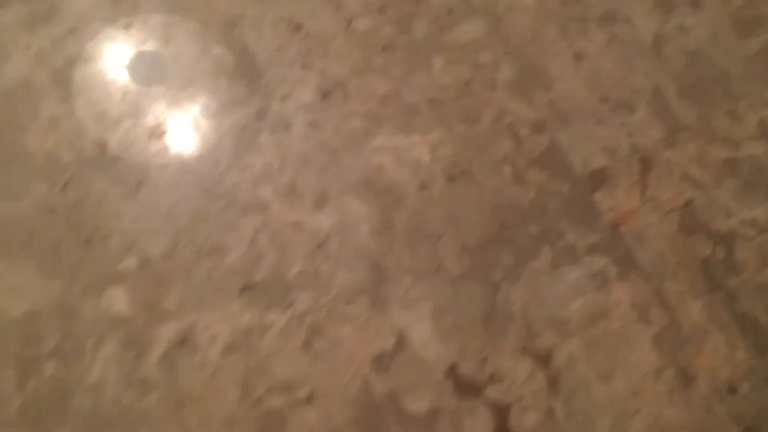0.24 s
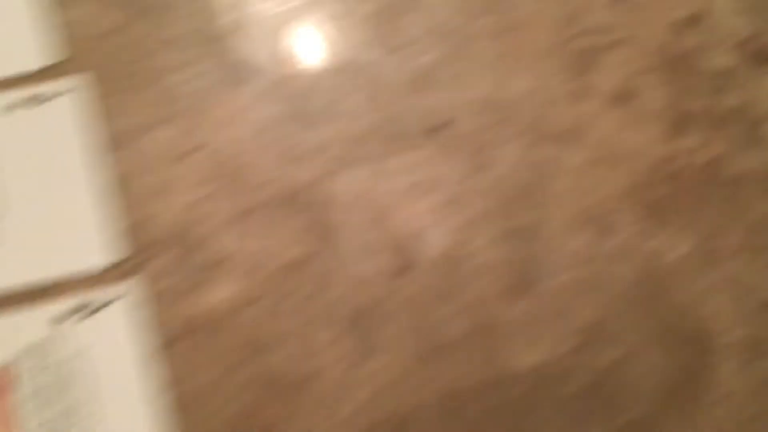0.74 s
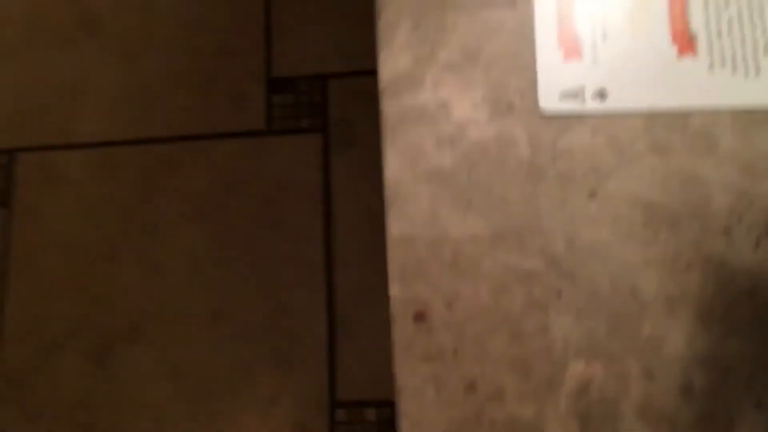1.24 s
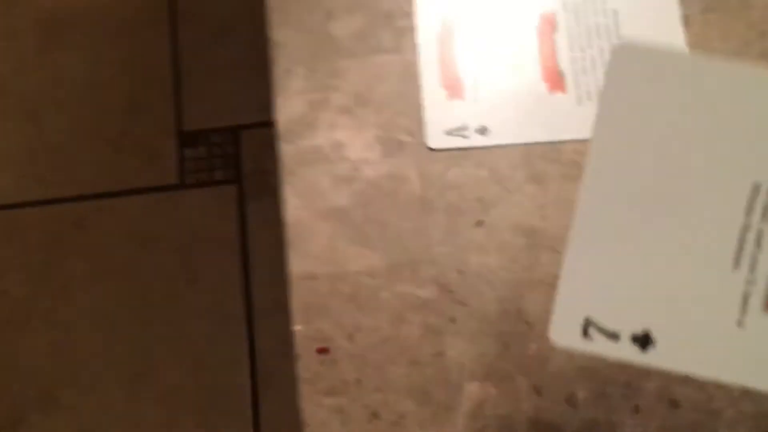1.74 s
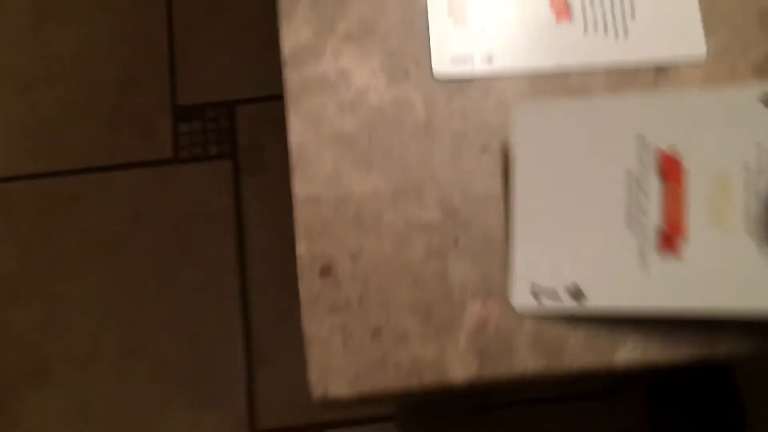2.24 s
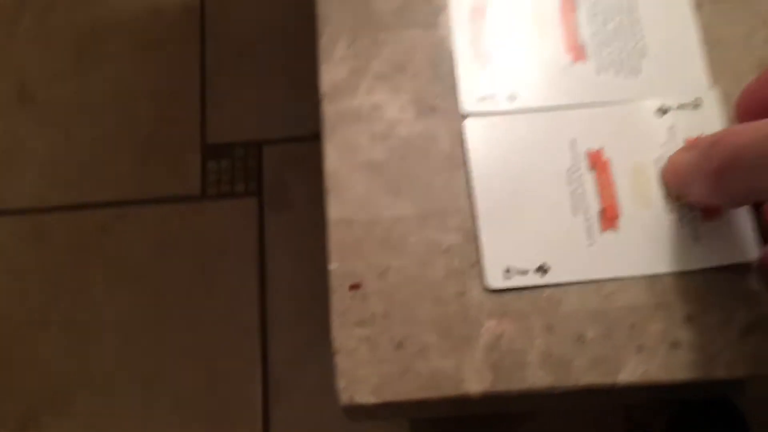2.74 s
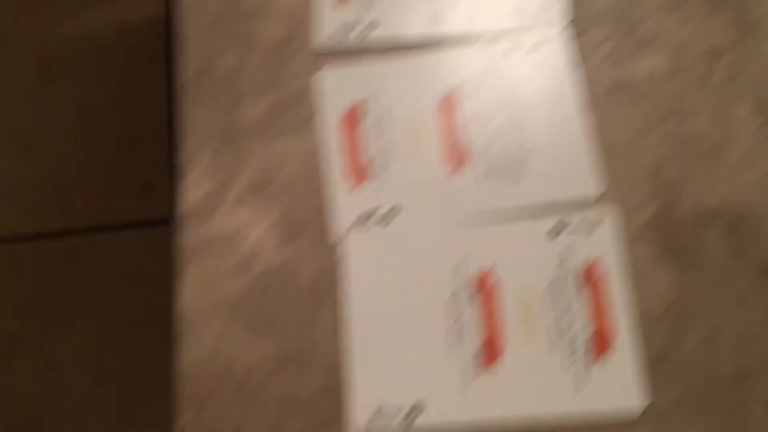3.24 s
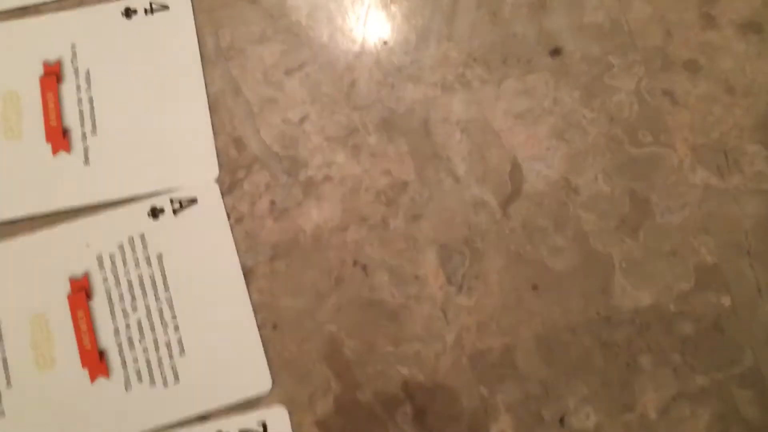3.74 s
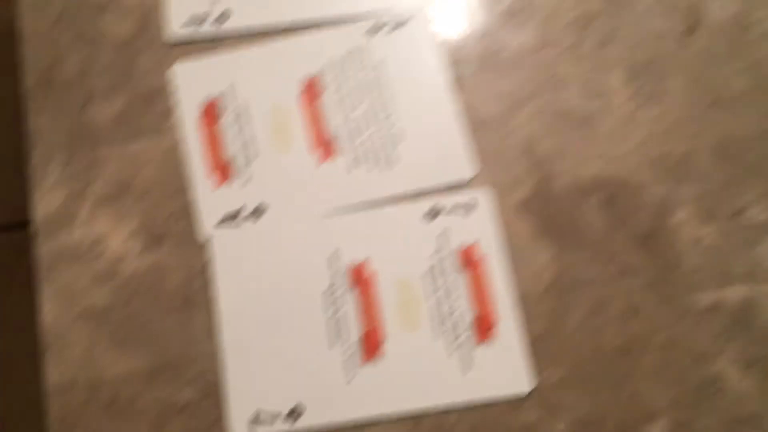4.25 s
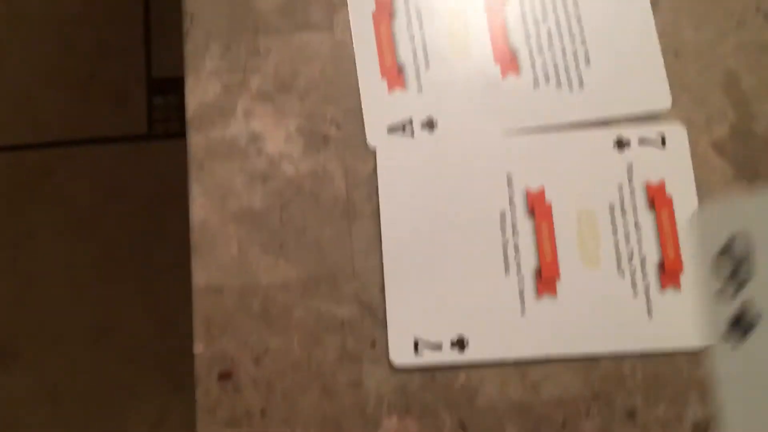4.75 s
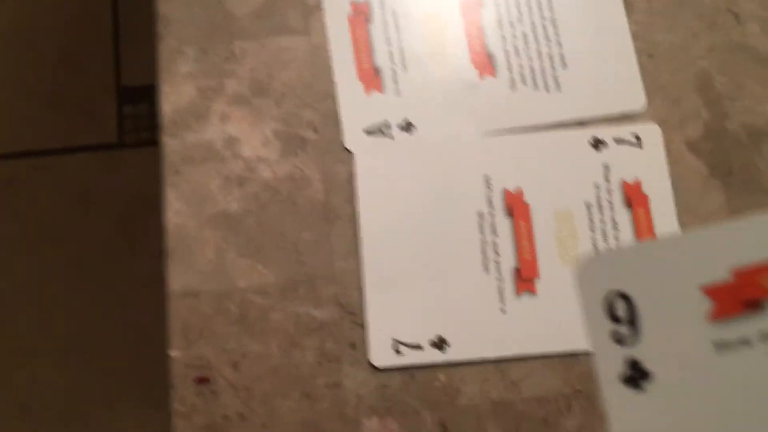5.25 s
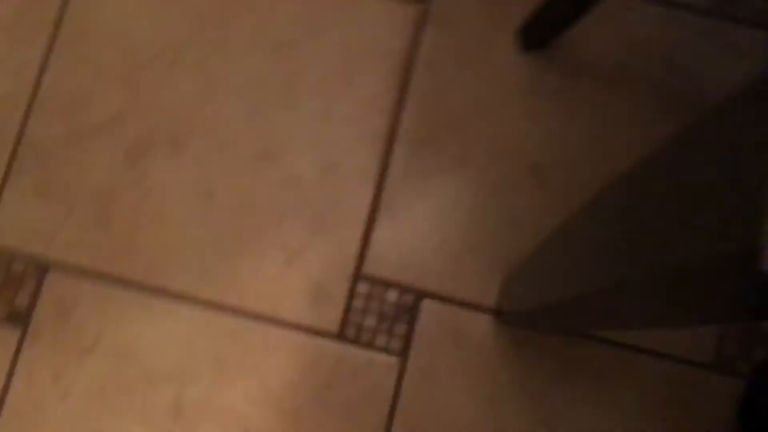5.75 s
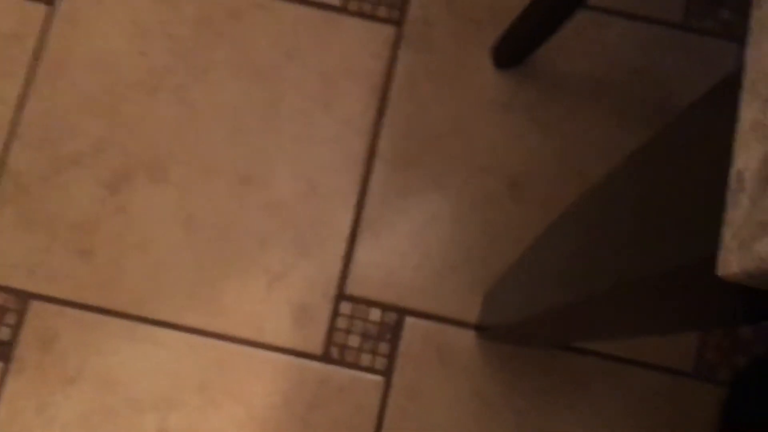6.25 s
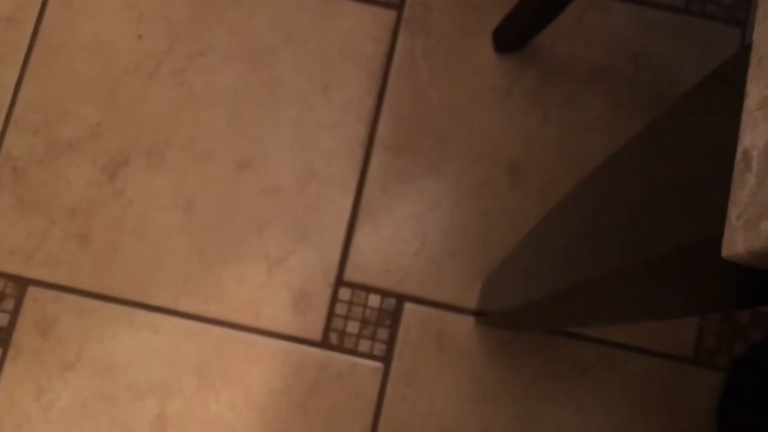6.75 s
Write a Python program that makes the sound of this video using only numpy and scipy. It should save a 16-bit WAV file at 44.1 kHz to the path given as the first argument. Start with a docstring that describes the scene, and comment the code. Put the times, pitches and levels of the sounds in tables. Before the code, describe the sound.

Playing cards swish papery over one another and snap down onto a hard kitchen counter, with small ticks, flicks and soft hand thuds.

```python
"""Cards dealt onto a kitchen counter

Playing cards are dealt onto a kitchen countertop, close to a hand-held microphone.
Each rub of card on card is three bands of shaped noise; ticks, flicks and a slap are bursts of tiny
contacts sounding through the card's resonances. The counter thuds under the hand as decaying sines.
A small hard room answers with decaying noise echoes, over quiet air and a low hum."""
import sys
import numpy as np
from scipy import signal
from scipy.fft import rfft, irfft, next_fast_len
from scipy.io import wavfile
from scipy.ndimage import uniform_filter1d, map_coordinates

SR = 44100
rng = np.random.default_rng(int(sys.argv[2]) if len(sys.argv) > 2 else 0)


def generate_wav(signal):
    """Clip the signal to [-1, 1] and save it as 16-bit WAV at the path in sys.argv[1]."""
    frames = np.transpose(np.atleast_2d(signal))
    scaled = np.clip(frames, -1, 1) * 32767
    pcm = np.round(scaled).astype(np.int16)
    wavfile.write(sys.argv[1], SR, pcm)


N = 308700  # length [samples], 7 s


def amp(db):
    """Decibels to gain."""
    return 10 ** (np.asarray(db) / 20)


def unit(x):
    """Scale to rms 1."""
    return x / np.sqrt(np.mean(x ** 2) + 1e-30)


def along(points, hz):
    """Read (frequency [Hz], value) points on a log frequency axis."""
    f, v = np.transpose(points)
    return np.interp(np.log(hz + 1), np.log(f + 1), v)


def wobble(rate):
    """A smooth random curve through `rate` knots a second."""
    knots = rng.standard_normal(int(N * rate / SR) + 4)
    return map_coordinates(knots, [np.arange(N) * rate / SR])


def filtered(x, response):
    """Shape x by a response given as a function of frequency."""
    size = next_fast_len(len(x) + SR // 10)
    spectrum = rfft(x, size) * response(np.fft.rfftfreq(size, 1 / SR))
    return irfft(spectrum, size)[:len(x)]


def coloured(x, spectrum):
    """Tint x with (frequency [Hz], gain [dB]) points, at rms 1."""
    return unit(filtered(x, lambda hz: amp(along(spectrum, hz))))


def causal(gain_db, size=1024):
    """Minimum-phase impulse response of a gain in dB, by folding its cepstrum."""
    cepstrum = irfft(np.log(amp(gain_db(np.fft.rfftfreq(size, 1 / SR)))))
    fold = 1 + np.sign(size // 2 - np.arange(size))
    fold[0] = 1
    return irfft(np.exp(rfft(cepstrum * fold)))


def add(track, s, sound):
    """Mix a sound into a track at time s [s]."""
    start = max(round(s * SR), 0)
    part = track[start:start + len(sound)]
    part += sound[:len(part)]


# colour of the quiet room: (frequency [Hz], relative density [dB per Hz])
QUIET_COLOUR = [(15, -36.5), (25, -15), (61, -3), (96, -13), (126, -13), (211, -18.5), (307, -18.5),
                (513, -25), (691, -27), (1320, -30.5), (1870, -30.5), (2890, -34.5), (3680, -34.5),
                (9210, -40.5), (15800, -46)]
QUIET_DB = -64.5  # rms level


def background(hum_hz=59, hum_db=-74):
    """Still room air and microphone hiss as tinted noise, with a low hum wavering in level and phase."""
    hum_level = amp(hum_db + 4 * wobble(7.8))
    hum = hum_level * np.sin(2 * np.pi * hum_hz * np.arange(N) / SR + 0.56 * wobble(4.1))
    return amp(QUIET_DB) * coloured(rng.standard_normal(N), QUIET_COLOUR) + hum


# how long the kitchen's echo lasts: (frequency [Hz], 60 dB decay time [s])
ECHO_DECAY = [(150, 0.5), (800, 0.7), (2000, 0.96), (5000, 1.01), (9000, 0.75), (15000, 0.33)]
# tone of the kitchen's echo: (frequency [Hz], relative level [dB])
ECHO_TONE = [(100, 3.5), (600, 4), (900, 4), (2000, 1), (2700, 1), (3600, -1), (6000, 1.5), (8000, -2),
             (15000, 1.5)]


def room(x, onset=0.003, early_db=5, early=0.075, count=7):
    """Strong early answers from near surfaces, then a diffuse echo; its noise tail is redrawn for each
    of `count` stretches as the microphone moves."""
    out = np.zeros(N)
    for index in np.array_split(np.arange(N), count):
        hz, t, noise = signal.stft(rng.standard_normal(SR * 2 // 3), SR, nperseg=256)
        decay_db = -60 * t / along(ECHO_DECAY, hz)[:, None]
        near_walls_db = early_db * np.exp(-t / early)
        fade_db = along(ECHO_TONE, hz)[:, None] + decay_db + near_walls_db
        tail = signal.istft(noise * amp(fade_db) * (1 - np.exp(-t / onset)), SR, nperseg=256)[1]
        add(out, index[0] / SR, signal.fftconvolve(x[index], tail / np.linalg.norm(tail)))
    return out


def snap_echo(click_db=-15, flick_db=-18, slap_db=-15, count=4):
    """The room's echo of the clicks, flicks and slap, dense and smooth: a blend of several random draws."""
    snaps = lambda: amp(click_db) * clicks() + amp(flick_db) * flicks() + amp(slap_db) * slaps()
    return sum(room(snaps()) for _ in range(count)) / np.sqrt(count)


# ringing modes of the worktop: (frequency [Hz], relative level [dB], 60 dB decay time [s])
COUNTER_MODES = [(240, 0, .14), (352, -2, .16), (455, -6, .12), (828, 1, .17), (1100, -1, .14),
                 (1390, -4, .15), (1547, -4, .17), (1768, -5, .18), (1890, -5, .2), (2212, -4, .15)]


def counter(waver=1.0):
    """A slap leaves the worktop ringing in decaying sines; the resting hand makes each phase drift."""
    out, t = np.zeros(N), np.arange(SR // 3) / SR
    for s, *_, db in SLAPS:
        for hz, mode_db, t60 in COUNTER_MODES:
            drift = waver * coloured(rng.standard_normal(len(t)), [(20, 0), (60, -10), (250, -60)])
            mode = np.sin(2 * np.pi * hz * t + drift)
            add(out, s + SLAP_GAP_S, amp(db + mode_db - 60 * t / t60) * mode)
    return out


# the hand's weight reaches the counter:
# (time [s], fundamental's level before attack and decay [dB], pitch [Hz], 60 dB decay time [s])
HAND_THUDS = [(.166, -45, 96.4, 0.39), (.39, -48.5, 98, .1), (0.876, -49.5, 353, 0.038),
              (2.234, -51, 230, 0.054), (2.7683, -31.5, 382, 0.016), (2.77, -45, 171, 0.091),
              (3.523, -52, 376, 0.058), (3.532, -39.5, 104, 0.21), (4.099, -40.5, 182, 0.066),
              (4.347, -47, 166, 0.047), (4.398, -38.5, 198, 0.024), (6.482, -31, 141, 0.083),
              (6.485, -42, 343, 0.033)]


def thuds(overtone=2.07, overtone_db=-9, rumble_db=-12, attack=0.00129):
    """Soft pushes set counter and hand swinging: a sine, a faster-fading overtone and some rumble."""
    out, t = np.zeros(N), np.arange(SR // 3) / SR
    for s, db, hz, t60 in HAND_THUDS:
        upper = amp(overtone_db - 30 * t / t60) * np.sin(2 * np.pi * overtone * hz * t)
        swing = np.sin(2 * np.pi * hz * t) + upper
        rumble_colour = [(hz / 4, -20), (hz, 0), (hz * 3, -8), (hz * 8, -40)]
        rumble = coloured(rng.standard_normal(len(t)), rumble_colour)
        envelope = amp(db - 60 * t / t60) * (1 - np.exp(-t / attack))
        add(out, s, envelope * (swing + amp(rumble_db) * rumble))
    return out


# a rubbed card (high) or the shifting hand (low) scuffs:
# (time of peak [s], level at peak [dB], centre [Hz], half length to 1/e [s])
SCUFF_EVENTS = [(.19, -65, 180, .032), (.2, -49, 13100, 0.1), (0.645, -64, 378, 0.052),
                (1.471, -65.5, 212, 0.076), (2.383, -62.5, 2960, 0.063), (3.801, -57, 2020, 0.057),
                (4.108, -53.5, 1920, 0.018), (5.944, -68.5, 3400, 0.046)]


def scuffs(width=0.19):
    """Friction noise swells and fades in one broad resonance."""
    out, t = np.zeros(N), np.arange(-SR // 5, SR // 5) / SR
    for s, db, centre_hz, half in SCUFF_EVENTS:
        resonance = lambda hz: 1 / (1 + (np.log((hz + 1) / centre_hz) / width) ** 2)
        band = unit(filtered(rng.standard_normal(len(t)), resonance))
        add(out, s + t[0], amp(db) * band * np.exp(-(t / half) ** 2))
    return out


def patchy(x, patchy_db):
    """The changing bend of a card lifts now one band, now another."""
    z = signal.stft(x, nperseg=512)[2]
    field = uniform_filter1d(rng.standard_normal(z.shape), 7, axis=0)
    field = uniform_filter1d(field, 7, axis=1)
    lifted = z * amp(patchy_db * unit(field))
    return unit(signal.istft(lifted, nperseg=512)[1][:N])


def friction(spectrum, grain_rate, grain_share):
    """Countless fibre slips, with sparser catches (grain_rate a second) of the card's textured finish."""
    catches = (rng.random(N) < grain_rate / SR) * rng.standard_normal(N)
    share = np.clip(grain_share, 0, 1)  # of the power
    fibres = np.sqrt(1 - share) * rng.standard_normal(N)
    return patchy(coloured(fibres + np.sqrt(share) * unit(catches), spectrum), patchy_db=2.2)


# one push of card over card: (time of top speed [s], rise [s], fall [s], level of the paper band
# at top speed [dB], low rasp re that level [dB], high hiss re that level [dB])
PUSHES = [(.06, 0.058, 0.065, -63.5, -4.5, 14), (.155, 0.043, 0.042, -55.5, -4.5, 12.5),
          (0.234, 0.059, 0.067, -54.5, -11, 7.5), (.5, 0.072, 0.072, -59.5, -6.5, 3),
          (0.639, 0.038, 0.071, -60, -1.5, -2.5), (.965, 0.037, 0.027, -63, 1, 0),
          (1.05, 0.099, 0.096, -65.5, -4, -0.5), (2.38, 0.078, 0.059, -65.5, -3.5, -3),
          (2.5, 0.077, 0.062, -63, -11, -5.5), (3.7, 0.03, 0.07, -56.5, -7, 9.5),
          (3.78, 0.037, 0.1, -51.5, -4.5, 7), (3.9, 0.072, 0.17, -63, -7.5, 2),
          (4.09, 0.057, 0.097, -55.5, -4.5, -7.5), (4.27, 0.059, 0.042, -60, -3, -3),
          (4.385, 0.044, 0.03, -54, -4, -2.5), (5.395, 0.032, .018, -58.5, -3, -1.5),
          (5.457, 0.024, .02, -63, 1, -2), (5.515, 0.027, 0.032, -57, -3, -8),
          (5.62, 0.027, 0.045, -56.5, 1, -6.5), (5.8, 0.11, 0.18, -74, 0.5, -0.5),
          (6.085, 0.025, 0.048, -64, -7.5, -2), (6.24, 0.059, 0.034, -67, -23, -5.5),
          (6.335, 0.013, .02, -68, -13, 1), (6.46, .08, 0.027, -63, -14, -6),
          (6.995, 0.036, .05, -67, -1, -3)]
# low, middle and high colours of rubbing card: (frequency [Hz], relative density [dB per Hz])
RASP_COLOUR = [(200, -27.5), (500, -11), (900, -9), (1400, -6), (2100, -2.5), (2600, -4), (3300, -11),
               (6000, -48.5)]
PAPER_COLOUR = [(1500, -40), (2400, -5.5), (2900, -4.5), (3400, 1), (4300, 0.5), (5100, -2), (6200, -2.5),
                (7200, -10), (11000, -38)]
HISS_COLOUR = [(4000, -43.5), (6000, -3), (6800, -2.5), (8000, -1.5), (9000, 0.5), (10400, -5), (11800, -2),
               (14000, -7.5), (16000, -14)]
# loss one rise or fall time from top speed; roundness of the swell (2 = bell)
STROKE_DROP_DB, STROKE_SHAPE = 8.5, 1.3
HISS_GROWS = 0.95  # multiplies the speed's dB swell for the hiss: a little shallower than the rest


def slides(judder_db=1.55, grip_db=1):
    """Each push speeds up and slows down; the uneven grip makes all its bands flutter together."""
    s, rise, fall, db, rasp_db, hiss_db = np.transpose(PUSHES)[:, :, None]
    t = np.arange(0, N, 64) / SR
    distance = np.maximum((s - t) / rise, (t - s) / fall)  # from top speed, in rise or fall times
    speed_db = -STROKE_DROP_DB * distance ** STROKE_SHAPE

    def level(band_db):
        """Sum the power of all pushes, then draw it out sample by sample."""
        return np.interp(np.arange(N) / SR, t, np.linalg.norm(amp(band_db), axis=0))

    rasp = level(db + rasp_db + speed_db) * friction(RASP_COLOUR, grain_rate=420, grain_share=0.37)
    paper = level(db + speed_db) * friction(PAPER_COLOUR, grain_rate=900, grain_share=0.311)
    hiss_level = level(db + hiss_db + HISS_GROWS * speed_db)
    hiss = hiss_level * friction(HISS_COLOUR, grain_rate=2000, grain_share=0.24)
    flutter_db = judder_db * wobble(260) + grip_db * wobble(60)
    return (rasp + paper + hiss) * amp(flutter_db)


# a card snapped down leaves a faint coloured ring: (time [s], reference level of the bands [dB])
SNAPS = [(2.768, -57.5)]
# bands of that ring: (centre [Hz], level re the reference [dB], 60 dB decay time [s])
SNAP_BANDS = [(740, -12.5, 1), (1856, -9, .6), (3450, -2.5, 0.595), (4700, -1.5, .7), (8650, -1.5, 0.32)]


def snap_rings(width_hz=140):
    """Blurred bands of noise linger after a hard snap."""
    out, t = np.zeros(N), np.arange(SR // 2) / SR
    for s, db in SNAPS:
        for centre_hz, band_db, t60 in SNAP_BANDS:
            resonance = lambda hz: 1 / (1 + ((hz - centre_hz) / width_hz) ** 2)
            band = unit(filtered(rng.standard_normal(len(t)), resonance))
            add(out, s, amp(db + band_db - 60 * t / t60) * band)
    return out


# colour shared by all snaps of a card held over the counter: (frequency [Hz], gain [dB])
SNAP_COLOUR = [(350, 1), (520, -6), (660, -1), (830, -4), (1300, 1), (1900, 1), (2300, 1), (2700, -3),
               (3300, 4), (4600, -1.5), (6000, 2.5), (7400, -1.5), (9000, 1)]
# bending modes of a gripped card: (multiple of its ring frequency, lift [dB])
BENDING_MODES = [(1, 9), (2.4, 1.5), (4.602, 1)]


def card(force, db, knock_db, bright_db, ring_hz, ring_width=0.09, spread=0.0431):
    """A force sounds through the card: a broad colour and bending resonances set by the grip."""
    colour = [(80, knock_db - 11.0), (450, knock_db - 5), (900, knock_db), (2000, 0.0021), (5000, 0),
              (8500, bright_db + 3.0), (12500, bright_db), (16000, bright_db - 9)]

    def modes(hz):
        """Sum the lift of every bending mode."""
        return sum(lift / (1 + (np.log((hz + 1) / (k * ring_hz)) / ring_width) ** 2)
                   for k, lift in BENDING_MODES)

    body = causal(lambda hz: along(colour, hz) + along(SNAP_COLOUR, hz) + modes(hz))
    # bending waves carry the highs faster than the lows
    dispersion = lambda hz: np.exp(-2j * np.pi * spread * np.sqrt(hz))
    sound = filtered(np.convolve(force, body), dispersion)
    span = .005 * SR  # the level counts all the energy as if spread over 5 ms
    return amp(db) * sound * np.sqrt(span / np.sum(sound ** 2))


def chatter(count):
    """Tiny contacts that push either way at random."""
    return np.sign(rng.standard_normal(count))


def strike(db, knock_db, bright_db, ring_hz, t60, blow=4.3):
    """One sharp contact, then the edge chatters to rest."""
    t = np.arange(SR // 20) / SR
    force = chatter(len(t)) * amp(-60 * t / t60) + blow * (t == 0)
    return card(force, db, knock_db, bright_db, ring_hz)


# an edge or face strikes:
# (time [s], level over 5 ms [dB], knock [dB], brightness [dB], card ring [Hz])
EDGE_CLICKS = [(0.0365, -47, -17, 4, 6800), (.617, -58, 20, -15, 700), (.879, -58, 14, -12, 650),
               (2.2332, -41.5, 6, -13.5, 2000), (2.4231, -38, -16.5, 1.5, 3400),
               (2.508, -51.5, -15, -7.5, 8400), (2.514, -50.5, -26.5, 3.5, 8900),
               (2.5656, -47.5, -16.5, -8.5, 4080), (3.1702, -57.5, 6, -6.5, 1580),
               (3.5226, -56.5, -3, -7, 1230), (3.7917, -36.5, -7.5, -5.5, 2260),
               (3.981, -49.5, -15, 18, 8730), (4.0956, -37, 3.5, -18, 2140), (4.2328, -55, 6, -7, 820),
               (5.9666, -62, -18, -4, 3460), (6.0134, -64.5, -15, -4, 4680), (6.2467, -56.5, -20, -1, 3270)]
# chatter's 60 dB decay at 0 dB knock; the extra knock that doubles it
CHATTER_T60_S, CHATTER_DOUBLES_DB = .011, 37.5


def clicks():
    """Edges tick; the heavier the knock, the longer the chatter."""
    out = np.zeros(N)
    for s, db, knock_db, bright_db, ring_hz in EDGE_CLICKS:
        t60 = CHATTER_T60_S * 2 ** (knock_db / CHATTER_DOUBLES_DB)
        add(out, s, strike(db, knock_db, bright_db, ring_hz, t60))
    return out


# a card sticks and slips before it runs freely off the deck:
# (time of first slip [s], its level over 5 ms [dB])
STICK_SLIPS = [(3.596, -52)]
SLIP_GAP_S, SLIP_GROWS_DB, SLIP_SWELL_S, SLIP_T60_S = .0238, 5, .03, .06


def slips(knock_db=-7, bright_db=4.0, ring_hz=9800, count=3):
    """A stutter is a row of evenly spaced bright flicks, each stronger than the last."""
    return [(s + k * SLIP_GAP_S, db + k * SLIP_GROWS_DB, knock_db, bright_db, ring_hz,
             SLIP_SWELL_S, SLIP_T60_S)
            for s, db in STICK_SLIPS for k in range(count)]


# an edge scrapes ever harder, then lets go: (time of release [s], level over 5 ms [dB], knock [dB],
# brightness [dB], card ring [Hz], 60 dB swell time [s], 60 dB decay time [s])
EDGE_FLICKS = [(.569, -55.5, -3, -5, 6400, 0.018, 0.015), (0.754, -61, -8, 17, 9800, 0.074, .051),
               (1.116, -64, -10, 2, 12600, .07, .015), (2.443, -55.5, -18, 1, 3280, .01, .017),
               (2.7602, -37.5, -1, -9, 4460, 0.024, 0.045), (2.7672, -25.5, -0.5, 5, 1865, 0.014, 0.005),
               (3.674, -47.5, 3, 1, 9040, .008, .05), (3.951, -56, -7, -1, 2230, 0.022, .02),
               (4.144, -53, -15, -15, 3830, .012, .03), (4.173, -53, -3, -13, 4700, .015, .025),
               (4.345, -39.5, 2, -7.5, 4170, 0.032, 0.022), (4.3959, -38, 8.5, -10.5, 1870, .12, 0.012),
               (5.33, -65, 15, -8, 1290, .01, 0.047), (5.674, -45.5, 12.5, -1.5, 3200, 0.018, 0.08),
               (5.688, -42, -6, -12, 3040, 0.055, 0.009), (5.886, -49.5, 5.5, -20, 2370, 0.04, 0.061),
               (6.063, -55.5, 10, -12, 3400, .014, 0.082), (6.4774, -42, 0, -12, 3850, .016, .005)]


def flicks():
    """Friction swells as a bent card drags over an edge and dies away as it springs free."""
    out, t = np.zeros(N), np.arange(-SR // 10, SR // 20) / SR
    for s, db, knock_db, bright_db, ring_hz, swell, t60 in EDGE_FLICKS + slips():
        force = chatter(len(t)) * amp(-60 * np.maximum(-t / swell, t / t60))
        add(out, s + t[0], card(force, db, knock_db, bright_db, ring_hz))
    return out


# a card slapped flat: (time [s], level of first contact over 5 ms [dB], its knock [dB],
# brightness [dB], its card ring [Hz], reference level of the counter's modes [dB])
SLAPS = [(6.4774, -25, 3, -4.5, 4460, -45)]
# it lands edge first; each further contact is weaker, heavier and lower as more card lies down
SLAP_GAP_S, SLAP_LOSS_DB, SLAP_KNOCK_DB, SLAP_RING_RATIO, SLAP_T60_S = .0034, 3, 4.5, 0.473, 0.016


def slaps(count=3):
    """A card rolls flat onto the counter in a few quick contacts."""
    out = np.zeros(N)
    for s, db, knock_db, bright_db, ring_hz, _ in SLAPS:
        for k in range(count):
            contact = strike(db - k * SLAP_LOSS_DB, knock_db + k * SLAP_KNOCK_DB, bright_db,
                             ring_hz * SLAP_RING_RATIO ** k, SLAP_T60_S)
            add(out, s + k * SLAP_GAP_S, contact)
    return out


def scene():
    """Cards and counter, near, with the room behind them."""
    rubbed, low, ring = slides() + scuffs(), thuds(), counter()
    near = clicks() + slaps() + flicks() + snap_rings() + rubbed + low + ring
    echo = snap_echo() + room(amp(-11.0) * rubbed + amp(-14) * low + amp(-8.0) * ring)
    return (near + echo + background())[None]


def record(dry, low_cut_hz=40, top_hz=16000):
    """The small microphone thins the deepest bass; the recorder keeps nothing above its band limit."""
    response = lambda hz: (hz < top_hz) / np.sqrt(1 + (low_cut_hz / (hz + 1)) ** 6)
    return np.array([filtered(channel, response) for channel in dry])


dry = scene()
out = record(dry)
generate_wav(out)
```